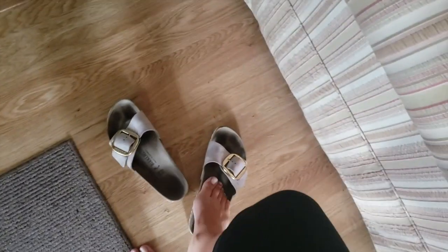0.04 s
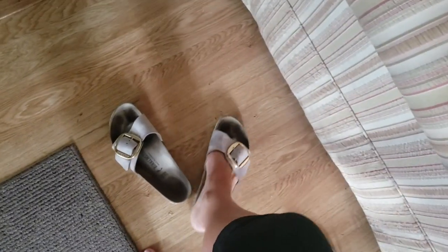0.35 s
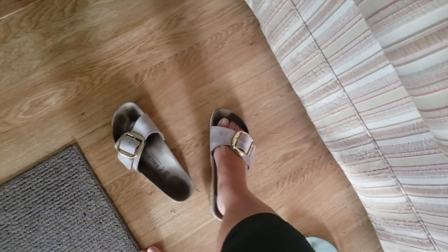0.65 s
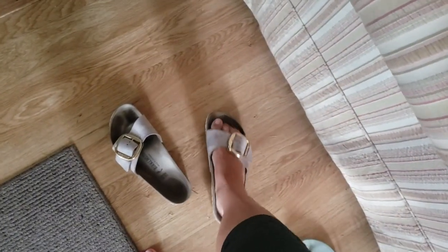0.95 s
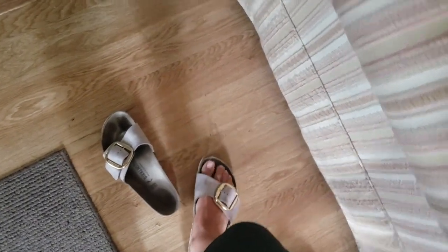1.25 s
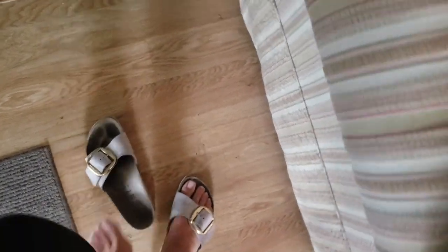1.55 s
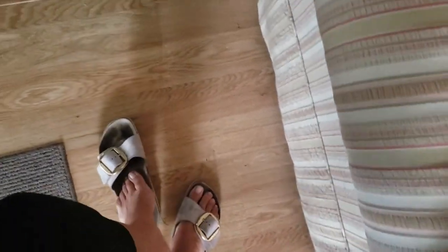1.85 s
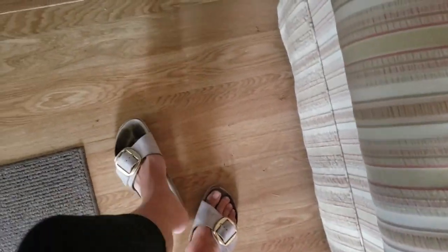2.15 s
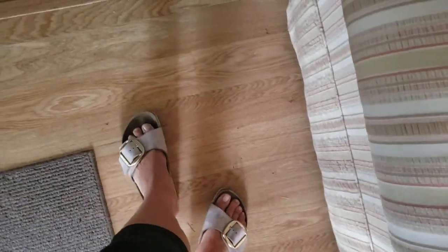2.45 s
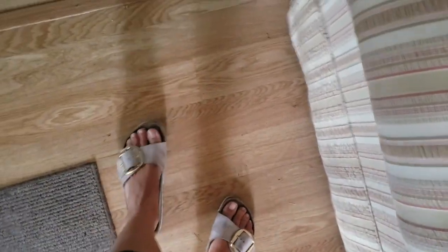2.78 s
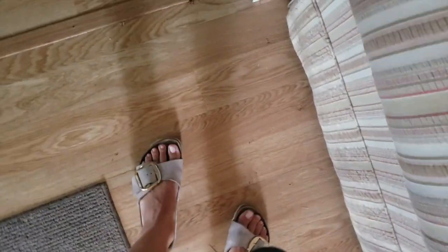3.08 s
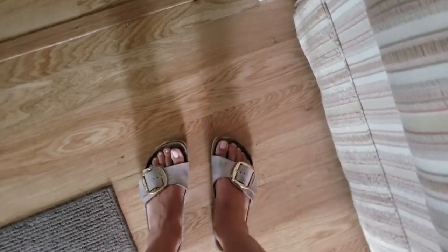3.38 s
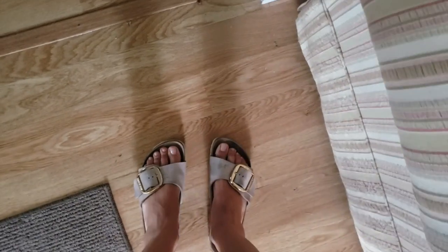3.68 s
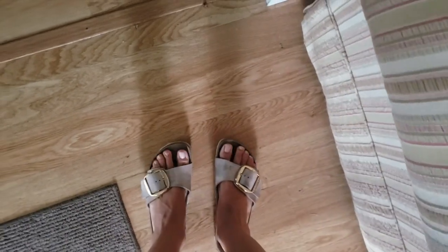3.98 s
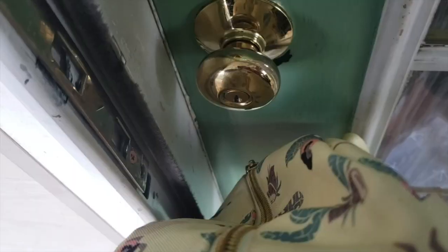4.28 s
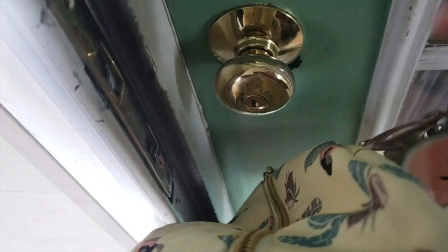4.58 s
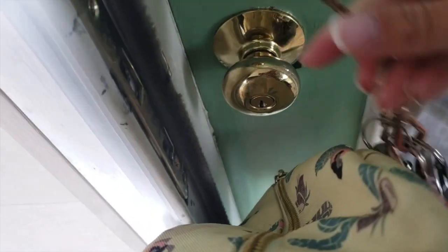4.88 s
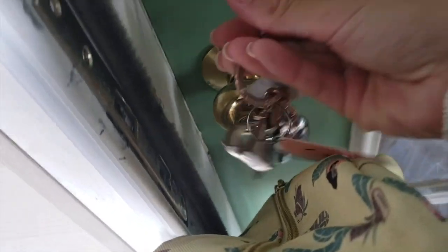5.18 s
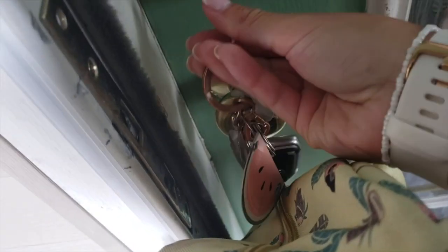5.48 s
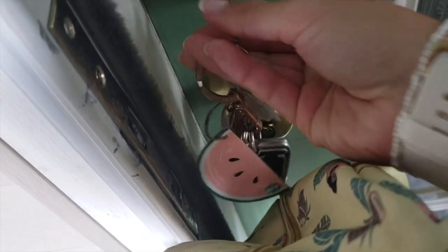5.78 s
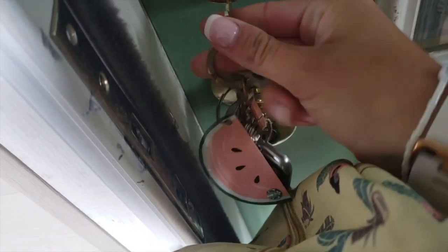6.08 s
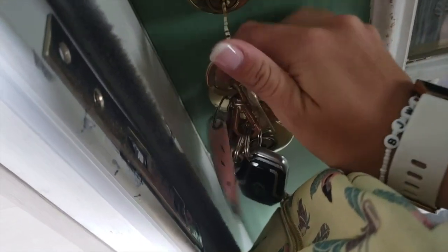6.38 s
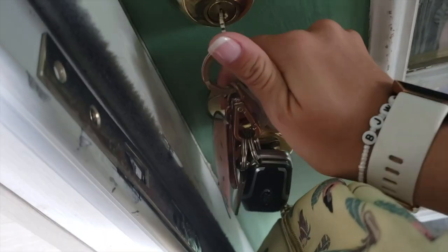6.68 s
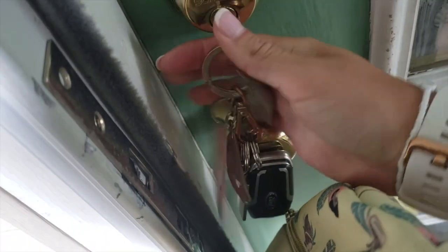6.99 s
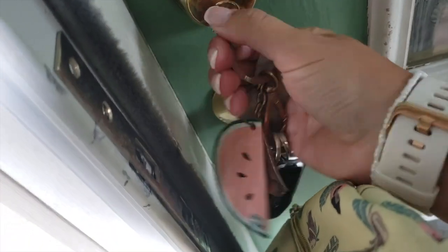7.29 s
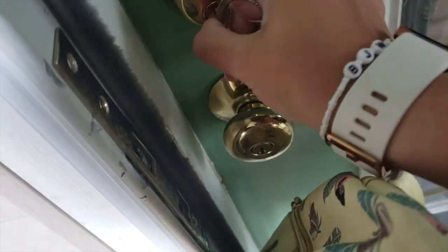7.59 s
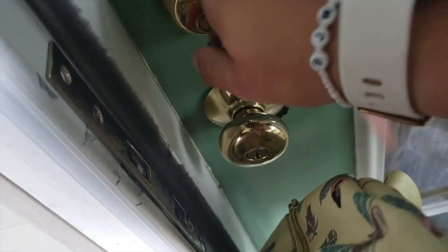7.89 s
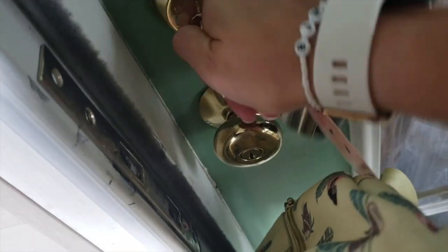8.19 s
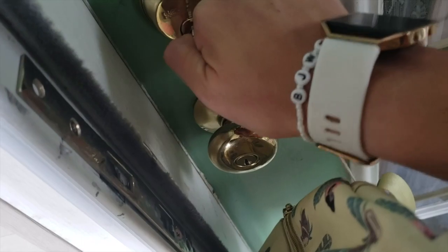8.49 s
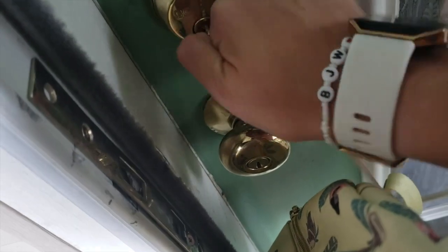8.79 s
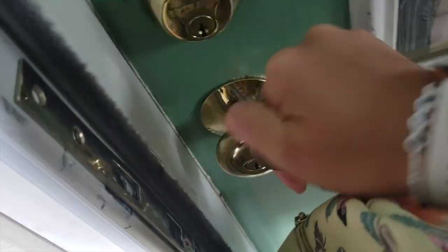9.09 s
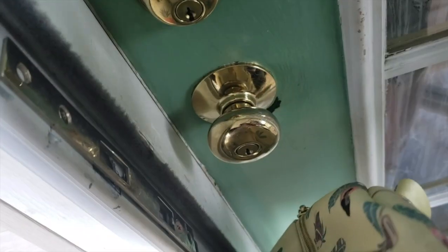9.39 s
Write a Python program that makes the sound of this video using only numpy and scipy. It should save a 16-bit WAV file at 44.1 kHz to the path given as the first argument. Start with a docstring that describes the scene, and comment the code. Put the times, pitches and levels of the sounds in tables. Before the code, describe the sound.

Feet slide softly into sandals on a wooden floor, then keys jingle close by and turn in a rattling door lock.

```python
"""A quiet room with a wooden floor, then the doorstep outside. Indoors, feet slide into sandals and shuffle:
skin and soles rub in tiny slips, buckles tick, weight settles on the boards and one sole skids sharply.
Abruptly we are at the front door, keys close to the microphone: they clink and ring in their bending modes,
one turns in the rattling brass lock, the bolt knocks over, the door shudders and the key is pulled out.
Behind them lie a low rumble, far machinery and a distant bird."""
import sys
import numpy as np
from scipy import signal
from scipy.fft import rfft, irfft
from scipy.io import wavfile
from scipy.ndimage import uniform_filter1d

SR = 44100
rng = np.random.default_rng(int(sys.argv[2]) if len(sys.argv) > 2 else 0)


def int16_out(signal):
    """Quantize to a 16-bit WAV file."""
    q = np.round(np.clip(np.atleast_2d(signal).T, -1, 1) * 32767)
    wavfile.write(sys.argv[1], SR, q.astype(np.int16))


N = 416683
TIME = np.arange(N) / SR
AGE = np.arange(SR // 2) / SR  # seconds since a blow
CLOCK = np.arange(0, N / SR, .001)  # coarse time for envelopes
OUTSIDE_S = 4.299  # from the room to the doorstep

# Levels are relative; pan_db is left minus right at the microphone; t60_s is the time to fall 60 dB.
# room tone and the air outside: frequency_hz, level_db
ROOM_TONE = [(25, -8), (62, 1), (100, -7), (170, -9), (300, -13), (500, -20), (1000, -27), (2200, -29),
             (4000, -32), (6400, -29), (8200, -37), (13000, -31), (16000, -33)]
OUTDOOR_TONE = [(15, -5.5), (25, -33), (43, -3.5), (87, -2.5), (161, -12), (206, -19), (326, -13.5),
                (416, -19.5), (575, -26), (840, -24), (1160, -34), (3080, -36), (8590, -40.5),
                (14800, -36.5), (16000, -39)]
# far machinery: pitch_hz, level_db
MACHINE_TONES = [(62, -53), (91.5, -52.5), (123.8, -55.5), (303, -74)]
# a distant bird: start_s, length_s, start_hz, end_hz, level_db
BIRD_WHISTLES = [(8.08, .14, 3330, 3190, -58), (8.57, .14, 3410, 3250, -59), (9.19, .13, 3320, 3200, -63)]

# spectra of rubbing, fine hiss, the skid, a wooden board and a hollow sole: frequency_hz, level_db
RUB_TONE = [(300, -29), (620, -9), (900, -20.5), (1700, -16), (2500, -1), (3400, -1.5), (4800, 2),
            (6400, 8), (8000, -11.5), (12000, -60.5)]
HISS_TONE = [(4000, -48), (7500, -1.5), (10500, 7), (13500, 2.5), (16000, 7.5)]
SKID_TONE = [(180, -29.5), (300, -30.5), (447, -43), (593, -32.5), (1100, -40), (1210, -52), (1530, -26),
             (1870, -31.5), (2250, -18.5), (3400, -15), (3950, -17), (4300, -11.5), (9390, -8.5),
             (11700, -1.5), (16000, -14)]
BOARD_TONE = [(50, -31), (130, -2.5), (210, 3.5), (330, -0.5), (450, -11), (900, -14), (3000, -74)]
SOLE_TONE = [(200, -22), (450, 8.5), (600, 8), (850, 1), (1300, -34.5), (4000, -41)]
# hollow rasp of the gap under the foot: multiple_of_resonance, level_db
RASP_TONE = [(0.151, -24), (0.301, -18.5), (0.497, -24), (.8, -10.5), (1, 0.5), (1.201, -7), (1.7, -8),
             (4, -12.5)]
# strokes of foot and sole: peak_s, rise_s, fall_s, rub_db, rasp_db, hiss_db, gap_hz, glide_octaves_per_s
FOOT_STROKES = [(.24, 0.078, 0.26, -67, -63, -67, 2120, 0.5),
                (0.427, 0.12, 0.14, -46.5, -47, -43, 2170, -2.5),
                (.58, .1, 0.29, -59.5, -59.5, -73, 1660, 3.5),
                (.725, 0.073, 0.089, -52, -61, -51.5, 1310, 0), (.885, 0.041, .1, -53, -53.5, -58, 1440, 0),
                (1.02, .05, 0.064, -64, -63.5, -68, 2030, 0),
                (1.165, 0.052, 0.11, -50.5, -89, -47.5, 2300, 2),
                (1.39, 0.079, 0.061, -70, -84, -68, 840, 0), (1.509, 0.1, .08, -100, -56, -57.5, 944, 1.5),
                (1.84, 0.028, 0.056, -68, -101, -71, 1300, 0),
                (1.915, .02, 0.056, -72, -96, -63.5, 1300, 0), (1.99, 0.05, 0.14, -72, -93, -69, 1300, 0),
                (2.2, 0.1, 0.26, -57, -58.5, -57, 1420, -0.3),
                (2.335, 0.08, 0.071, -53, -61, -48, 1590, -1),
                (2.515, 0.075, .11, -52, -53.5, -53.5, 1860, 0.5), (2.65, 0.08, .1, -62, -89, -57, 1800, 0),
                (2.73, 0.061, 0.084, -61.5, -71, -60.5, 1740, 4),
                (2.96, 0.12, .18, -71, -97, -63.5, 1200, 0), (3.1, 0.1, .09, -69.5, -71, -63.5, 870, 1),
                (3.165, 0.041, 0.13, -58.5, -78, -49, 875, 0)]
# weight settling on the boards: start_s, level_db, hollow_sole_db
FOOTFALLS = [(0.528, -55.5, -20), (0.664, -48.5, -4), (0.714, -61, -1), (1.268, -47, -36),
             (1.305, -59, -21), (3.034, -54.5, -21), (3.261, -51.5, -21)]
# straps and buckles ticking: start_s, level_db
BUCKLE_TICKS = [(0.2993, -35), (0.6454, -56), (0.716, -27), (1.5844, -39.5), (1.8248, -53), (2.7127, -40)]

# modes of the door panel, its frame, the lock's brass and the bending keys: pitch_hz, level_db, t60_s
PANEL_RINGS = [(300, -7.5, 0.17), (386, -11.5, 0.2), (516, -8.5, 0.11), (628, -0.5, 0.039),
               (702, -11.5, 0.1), (795, 7, 0.018), (1330, -33, 0.017)]
FRAME_RINGS = [(77.2, -1.5, 0.81), (91.2, 15, 0.27), (133, -10, 0.2)]
BRASS_RINGS = [(1050, 3.5, 0.06), (1244, -10, 0.12), (1567, 13, 0.027), (1852, 5.5, 0.06), (2244, -2, 0.1),
               (2960, -18, .06), (3180, -5, 0.14), (3540, -7, 0.21), (3900, -10, 0.27), (4490, 0, 0.12),
               (4900, -31, 0.04)]
KEY_RINGS = [(3150, -10, .1), (3420, -8, .1), (3960, -3, .07), (4680, -4, .08), (5600, -6, .08),
             (6660, 0, .13), (7230, -6, .1), (7490, -8, .14), (9090, -9, .15), (9890, -8, .16),
             (10500, -9, .13), (10990, -8, .13), (11500, -8, .12), (11920, -6, .12), (12630, -6, .13),
             (13240, -2, .13), (13880, -3, .1), (14255, -1, .13), (14700, -4, .08), (15150, -2, .08),
             (15460, -1, .13)]
# spectra of bare contact on the door, the brass and the keys (high, low): frequency_hz, level_db
DOOR_TONE = [(80, -26), (180, -4), (300, 5), (420, -2), (520, -2), (780, -4), (1100, -9.5), (3000, -42)]
BRASS_TONE = [(400, -6.5), (800, -4.5), (1200, -1), (2000, -3), (4000, -1.5), (6800, -4), (9000, -22.5),
              (16000, -45)]
KEY_HIGH_TONE = [(4000, -41), (7500, -9.5), (9500, -3.5), (12000, -0.5), (14000, 4), (16000, 1)]
KEY_LOW_TONE = [(500, -6), (1500, -1), (2600, 0.5), (3800, 11.5), (5200, 4.5), (6700, 12), (8500, -3),
                (14000, -99)]
# the bolt knocking home: start_s, level_db
BOLT_KNOCKS = [(8.0682, -11.5), (8.9132, -14)]
# the door shifting in its frame: start_s, level_db, panel_rattle_db
DOOR_SHUDDERS = [(5.216, -32.5, -9.5), (6.615, -30, -5.5), (6.671, -33.5, -2), (6.81, -33, 0.5),
                 (7.259, -28, -5.5), (7.452, -33.5, 1.5), (7.56, -31.5, -2), (8.076, -32, -9),
                 (8.914, -29, -4), (8.944, -19.5, -8), (8.985, -23.5, -8)]
# key, pins and bolt striking: start_s, level_db, door_body_db, bright_edge_db, ring_hz, pan_db, rattle_t60_s
LOCK_STRIKES = [(4.5204, -38, -35, 7, 1114, -2, 0.032), (4.5348, -38, -38, -5, 4400, 8, 0.015),
                (4.7263, -33.5, -27, -3, 944, 0, 0.0092), (5.2133, -21, -8.5, 7, 1175, 1.5, 0.017),
                (5.2953, -21.5, -13.5, 8.5, 3890, 4, 0.0049), (5.8591, -36.5, -31, 7, 6600, 10, 0.0063),
                (6.1184, -35, -23, 1, 1570, 4, 0.0063), (6.2104, -35, -9, 13, 6600, 7, 0.04),
                (6.6706, -33, -9, 0, 1130, 7, 0.054), (6.701, -30.5, -6, -1, 1140, 5, 0.085),
                (6.7616, -23, -4.5, -4, 1240, 6, 0.0091), (7.0548, -25, -19, -7, 3340, 9.5, 0.0059),
                (7.253, -21.5, -5.5, 6.5, 1260, 5, 0.02), (7.44, -21, -1.5, -30, 883, 6.5, 0.0076),
                (7.449, -46, -5, -5, 920, -4, 0.025), (7.498, -32, -3, -11, 3030, 7.5, 0.02),
                (7.5637, -36.5, -3, -17, 1710, 14, 0.019), (7.5997, -31.5, -1.5, -23, 3040, 6.5, 0.035),
                (7.7987, -47.5, 3.5, 3, 3830, 7, 0.02), (7.8556, -32, -14, -9, 2420, 3, 0.015),
                (7.885, -33.5, -5.5, -6, 3440, 2, 0.075), (8.2798, -36, -10, -9, 5070, 6, 0.0054),
                (8.646, -36, -13, 3, 1400, 6.5, 0.018), (8.696, -21.5, -5, 6, 1450, 4.5, 0.018),
                (8.7134, -28.5, -10, 8, 1310, 3, 0.044), (8.7894, -32.5, -19, -14, 1900, 5, 0.047),
                (8.9125, -28, -2, 11, 913, 0.5, 0.015), (8.9502, -31.5, -5, 5, 1183, 6.5, 0.02),
                (9.1497, -20.5, -11.5, 14, 4180, -3.5, 0.045), (9.1572, -24, -16, -4, 3900, 11, 0.065),
                (9.1683, -25.5, -36, 11.5, 3070, -6, 0.026), (9.3228, -27.5, -41, 0, 2230, 5, 0.0044),
                (9.3824, -34.5, -15, 13, 3430, 5, 0.14), (9.418, -31, -38, -3, 2100, 1, 0.043)]
# the bunch shaken or the blade sliding in its slot: peak_s, half_length_s, jingle_db, scrape_db
BUNCH_SHAKES = [(4.792, 0.035, -44, -55), (5.656, 0.024, -47, -56), (6.002, 0.091, -43.5, -53.5),
                (6.24, 0.12, -42.5, -54.5), (6.49, 0.099, -43, -61.5), (6.799, 0.065, -35.5, -45),
                (6.92, 0.023, -39, -49.5), (7.06, 0.031, -51, -53), (7.198, 0.035, -48, -58),
                (7.343, 0.17, -47, -48), (7.479, 0.12, -46, -43), (7.574, 0.089, -46, -49.5),
                (7.89, 0.081, -50, -46), (8.635, 0.053, -54, -54), (8.79, 0.16, -46.5, -55),
                (9.02, 0.11, -42.5, -48.5), (9.15, 0.062, -41, -50.5), (9.413, 0.095, -32.5, -45)]
# keys striking each other, close by: start_s, level_db, lower_partials_db, pan_db
KEY_CLINKS = [(4.306, -27.5, -12.5, -5), (4.32, -25, -12, 0), (4.3632, -31.5, -4, 1),
              (4.3809, -25.5, -9, -3), (4.442, -28, -5.5, 0), (4.465, -31.5, -3, 0), (4.5065, -11, -17, 1),
              (4.5367, -14, -10, 1), (4.6098, -22, -6.5, 2), (4.702, -31, -26, -2),
              (4.7264, -22, -10.5, -2), (4.742, -32, -13, -1), (4.8853, -31, -3, -1.5),
              (5.008, -29.5, -10, -4), (5.0422, -30.5, -8, 1), (5.1053, -20, -12.5, -.5),
              (5.18, -32.5, -12, 5), (5.24, -22, -4.5, 1), (5.3241, -27.5, -1, 2), (5.3843, -36.5, -3, 7),
              (5.4377, -28, -10.5, 0), (5.495, -27.5, -16, 1), (5.56, -35.5, -4.5, 3),
              (5.5993, -36.5, -2.5, 5), (5.8609, -19.5, -15.5, -1), (5.965, -22, -18.5, 0.5),
              (6.1677, -33, -17, -2), (6.208, -23.5, -19, -6), (6.437, -32, -3, 3), (6.6168, -29.5, -13, 1),
              (6.669, -19.5, -24, -2), (6.703, -18.5, -19, -2), (6.759, -11.5, -31, -1),
              (6.79, -21, -21, -2.5), (6.8696, -17.5, -10.5, 3), (6.8817, -23, -14, -5),
              (6.9065, -25.5, -6.5, 8), (6.9296, -25, -13, 1), (6.987, -18.5, -11, 6),
              (7.018, -18.5, -10, 2.5), (7.0543, -17, -9.5, -2), (7.078, -12, -9.5, 1.5),
              (7.1324, -26, -7.5, 3), (7.1733, -26, -4, 4), (7.187, -15.5, -14, 0),
              (7.1988, -24.5, -1.5, 4), (7.225, -15, -12, 4), (7.2537, -20, -35, -13), (7.2704, -22, -8, 4),
              (7.3257, -24, -23, -2), (7.34, -23.5, -3.5, 5), (7.3713, -32, -2, 7), (7.453, -24, -26, -3),
              (7.52, -25.5, -10, 0), (7.5622, -26, -11, -7), (7.8001, -27, -7.5, 2), (7.8266, -25, -8.5, 0),
              (7.8531, -21, -6.5, -3), (7.9, -29, -10, -1), (8.2867, -31.5, -28, -7), (8.6362, -38, -6, -6),
              (8.7127, -24, -16, -12), (8.788, -28, -1.5, -1), (8.871, -36, -17, -9), (8.949, -26, -29, -3),
              (8.972, -21, -12.5, -3), (8.991, -19.5, -9.5, 1), (9.011, -19.5, -17, -2),
              (9.2684, -28, -11, -4), (9.3827, -27.5, -13, -4), (9.415, -18, -17, -7)]


def amp(db):
    """Decibels to gain."""
    return 10 ** (np.asarray(db) / 20)


def unit(x):
    """Scale to rms 1."""
    return x / np.sqrt(np.mean(x ** 2))


def blow(x, size=88, crest_db=5):
    """Scale a blow so that its peak lies near 1."""
    power = uniform_filter1d(np.mean(np.atleast_2d(x) ** 2, axis=0), size)
    return amp(-crest_db) * x / np.sqrt(power.max())


def pan(db):
    """Left and right gains, db apart."""
    return amp(np.array([[.5], [-.5]]) * db)


def fade(t60):
    """Exponential decay after a blow."""
    return np.exp(-np.log(1000) * AGE / max(t60, 1e-3))


def add(out, s, sound):
    """Mix a sound in at time s."""
    i = max(int(s * SR), 0)
    out[:, i:i + sound.shape[-1]] += sound[..., :N - i]


def through(x, response):
    """Pass a sound through an impulse response."""
    return signal.fftconvolve(np.atleast_2d(x), np.atleast_2d(response), axes=1)[:, :x.shape[-1]]


def moving(x, response_at, size=4410):
    """Pass overlapping stretches of a sound through a response that changes with time."""
    out, window = np.zeros((2, N)), np.hanning(size)
    for i in np.arange(0, N - size, size // 2):
        stretch = np.atleast_2d(x[..., i:i + size] * window)
        if stretch.any():
            response = np.atleast_2d(response_at((i + size / 2) / SR))
            add(out, i / SR, signal.fftconvolve(stretch, response, axes=1))
    return out


def colour(points, size=1024):
    """Causal impulse response of unit energy with the given (frequency_hz, level_db) spectrum."""
    hz, db = np.transpose(points)
    bins = np.maximum(np.arange(size // 2 + 1) * SR / size, 1)
    cepstrum = irfft(np.log(amp(np.interp(np.log(bins), np.log(hz), db))))
    cepstrum[1:size // 2] *= 2  # fold to minimum phase
    cepstrum[size // 2 + 1:] = 0
    response = irfft(np.exp(rfft(cepstrum)))
    return response / np.linalg.norm(response)


def patchy(points, spread_db, count=28):
    """A colour with random peaks and dips: no two contacts happen at the same spot."""
    hz, db = np.transpose(points)
    grid = np.geomspace(hz[0], hz[-1], count)
    uneven_db = np.interp(np.log(grid), np.log(hz), db) + spread_db * rng.standard_normal(count)
    return colour(np.transpose([grid, uneven_db]))


def partials(modes):
    """One decaying sine for each mode."""
    return np.array([amp(db) * fade(t60) * np.sin(2 * np.pi * hz * AGE) for hz, db, t60 in modes])


def wander(rate_hz):
    """Smooth random drift of rms 1."""
    hold = int(SR / rate_hz)
    steps = np.repeat(rng.standard_normal(N // hold + 1), hold)
    return unit(uniform_filter1d(uniform_filter1d(steps, hold), hold)[:N])


def grains(n, per_s, spread_db):
    """Tiny contacts at random moments with uneven sizes."""
    impulses = (rng.random(n) < per_s / SR) * rng.choice([-1, 1], n)
    return unit(impulses * amp(spread_db * np.minimum(rng.exponential(size=n), 4)))


def swell(peak_s, rise_s, fall_s):
    """A movement at its height at peak_s, 20 dB weaker a rise before and a fall after."""
    before = np.maximum((peak_s - CLOCK) / rise_s, 0)
    after = np.maximum((CLOCK - peak_s) / fall_s, 0)
    return amp(-20 * (before ** 2.64 + after ** 1.66))  # powers above 1 bite suddenly, then hold


def together(envelopes, db):
    """Strength of overlapping movements, each with its own level."""
    return np.interp(TIME, CLOCK, np.sqrt(amp(db) ** 2 @ np.square(envelopes)))


def contact(chatter_t60, chatter_db):
    """A first touch, then the pieces chatter against each other."""
    chatter = grains(len(AGE), per_s=2500, spread_db=2.5) * fade(chatter_t60) * (1 - fade(0.0021))
    force = amp(chatter_db) * chatter / (np.linalg.norm(chatter) + 1e-9)
    force[0] += 1
    return force


def struck(force, tone, rings, ring_db):
    """Bare contact sound plus modes; every point of impact stirs the modes differently."""
    response = rng.standard_normal((2, len(rings))) @ rings
    response *= amp(ring_db) * np.sqrt(2) / np.linalg.norm(response)
    response[:, :len(tone)] += tone
    return through(force, response)


def space(early_db, early_t60, late_db, late_t60, lag_samples=8):
    """Path to the microphone: direct sound, lagging at random on the right, near reflections and a tail."""
    response = np.zeros((2, len(AGE)))
    for db, t60 in ((early_db, early_t60), (late_db, late_t60)):
        reflections = rng.standard_normal((2, len(AGE))) * fade(t60) * (1 - fade(0.0065))
        response += amp(db) * reflections / np.linalg.norm(reflections[0])
    response[0, 0] += 1
    response[1, rng.integers(lag_samples)] += 1
    return response


def doorway():
    """The door and its frame throw each click straight back at the microphone."""
    return space(early_db=-2, early_t60=.055, late_db=-12, late_t60=.2)


def air(spectrum, db, wander_db, wide_hz):
    """The air all around, swelling gently; below wide_hz both channels are alike."""
    mid, side = through(rng.standard_normal((2, N)), colour(spectrum, size=8192))
    side = signal.sosfilt(signal.butter(1, wide_hz, "high", fs=SR, output="sos"), side)
    return amp(db + wander_db * wander(5)) * np.array([mid + side, mid - side]) / np.std(mid)


def machinery():
    """Far off, machinery drones, wavering in strength and phase."""
    return sum(amp(db + 2 * wander(6.1)) * np.sqrt(2) * np.sin(2 * np.pi * hz * TIME + 1.04 * wander(8))
               for hz, db in MACHINE_TONES)


def bird():
    """In the distance, soft pure whistles slide down."""
    out = np.zeros((2, N))
    for s, length_s, start_hz, end_hz, db in BIRD_WHISTLES:
        hz = np.linspace(start_hz, end_hz, int(length_s * SR))
        arch = np.sin(np.linspace(0, np.pi, len(hz)))
        add(out, s, amp(db) * arch * np.sin(2 * np.pi * np.cumsum(hz) / SR))
    return through(out, space(early_db=-14, early_t60=.05, late_db=-14, late_t60=.3, lag_samples=1))


def sliding_feet():
    """A little to the left, skin and soles rub in dense tiny slips that stir the gap under the foot."""
    peak_s, rise_s, fall_s, rub_db, rasp_db, hiss_db, gap_hz, glide = np.transpose(FOOT_STROKES)
    strokes = np.array([swell(*shape) for shape in zip(peak_s, rise_s, fall_s)])

    def gap(s):
        """The stroke that rasps most sets the gap's gliding resonance."""
        k = np.argmax(amp(rasp_db) * strokes[:, np.searchsorted(CLOCK, s)])
        octaves = glide[k] * np.clip(s - peak_s[k], -rise_s[k], fall_s[k])
        return colour(np.array(RASP_TONE) * [gap_hz[k] * 2 ** octaves, 1])

    grip = amp(0.65 * wander(60)) * (TIME < OUTSIDE_S)
    slips, fine_slips = (grip * grains(N, per_s=9000, spread_db=2.5) for _ in range(2))
    rubbing = together(strokes, rub_db) * through(slips, colour(RUB_TONE))
    hiss = together(strokes, hiss_db) * through(fine_slips, colour(HISS_TONE))
    rasp = amp(-2) * together(strokes, rasp_db) * moving(slips, gap)
    return (rubbing + hiss + rasp) * pan(3)


def skid(start_s=3.256, attack_s=0.0026, hold_s=0.086, sag_db_per_s=62.5, release_db_per_s=300.5):
    """One sole bites, sags a little while it slides, then lifts."""
    age = np.maximum(TIME - start_s, 0)
    db = -28.5 - sag_db_per_s * age - release_db_per_s * np.maximum(age - hold_s, 0)
    pressure = np.minimum(age / attack_s, 1) * amp(db)
    return pressure * through(grains(N, per_s=5900, spread_db=3.0), colour(SKID_TONE))


def sandals():
    """In the room, feet slide and skid, buckles tick and heels settle on the boards."""
    out = sliding_feet() + skid()
    for s, db in BUCKLE_TICKS:
        add(out, s, amp(db) * blow(through(contact(.02, chatter_db=-20), colour(HISS_TONE))))
    # the reflections change as the feet move
    out = amp(-0.5) * moving(out * (TIME < OUTSIDE_S),
                             lambda s: space(early_db=-3.5, early_t60=0.053, late_db=-6, late_t60=0.42))
    for s, db, hollow_db in FOOTFALLS:
        push = rng.standard_normal(len(AGE)) * fade(.26) * (1 - fade(.025))
        board = blow(through(push, colour(BOARD_TONE)))
        sole = blow(through(push, colour(SOLE_TONE)))
        add(out, s, amp(db) * (board + amp(hollow_db) * sole) * pan(1.7))
    return out


def door():
    """The bolt knocks the panel; the whole door rocks in its frame."""
    out, knock = np.zeros((2, N)), -partials(PANEL_RINGS).sum(axis=0)
    for s, db in BOLT_KNOCKS:
        path = space(early_db=-6, early_t60=0.086, late_db=-16, late_t60=0.39, lag_samples=3)
        panel = blow(through(knock, path))
        force = through(contact(0.012, chatter_db=0), doorway())
        snap = blow(through(force, colour(KEY_HIGH_TONE) + colour(KEY_LOW_TONE)))
        add(out, s, amp(db) * (panel + amp(-10) * snap) * pan(1))
    rocking = blow(partials(FRAME_RINGS).sum(axis=0) * (1 - fade(0.1)))  # builds slowly on the soft seal
    for s, db, rattle_db in DOOR_SHUDDERS:
        rattle = blow(through(rng.standard_normal(len(AGE)) * fade(0.43), colour(BOARD_TONE)))
        add(out, s, amp(db) * (rocking + amp(rattle_db) * rattle))
    return out


def lock():
    """Brass parts rattle in the cylinder and shake the door panel; the part hit rings at its own pitch."""
    out, rings = np.zeros((2, N)), partials(BRASS_RINGS)
    for s, db, body_db, edge_db, ring_hz, pan_db, rattle_t60 in LOCK_STRIKES:
        force = through(contact(rattle_t60, chatter_db=11.5), doorway())
        brass = blow(struck(force, patchy(BRASS_TONE, spread_db=0), rings, ring_db=-8))
        ring = amp(-7) * blow(partials([(ring_hz, 0, 90 / ring_hz)]))  # a high ring dies sooner
        edge = amp(edge_db - 3) * blow(through(force, colour(KEY_HIGH_TONE)))
        body = amp(body_db) * blow(through(rng.standard_normal(len(AGE)) * fade(0.12), colour(DOOR_TONE)))
        add(out, s, amp(db) * (brass + ring + edge + body) * pan(pan_db))
    return out


def swinging_bunch(carried_until_s=7.63, settle_t60=0.19):
    """Keys brush and the blade scrapes: a little while carried, more at shakes; clinks leave a jingle."""
    peak_s, half_length_s, jingle_db, scrape_db = np.transpose(BUNCH_SHAKES)
    shakes = [swell(s, half, half) for s, half in zip(peak_s, half_length_s)]
    clink_s, clink_db = np.transpose(KEY_CLINKS)[:2]
    decays = [(CLOCK > s) * amp(-60 * np.abs(CLOCK - s) / settle_t60) for s in clink_s]
    settling = together(decays, clink_db - 26)
    carried = TIME < carried_until_s
    jingling = np.sqrt(together(shakes, jingle_db) ** 2 + settling ** 2 + carried * amp(-57.5) ** 2)
    scraping = np.hypot(together(shakes, scrape_db), carried * amp(-59))
    rings = partials(KEY_RINGS)
    touches = grains(N, per_s=600, spread_db=3.5) * (TIME > OUTSIDE_S)
    jingle = moving(touches,
                    lambda s: struck(doorway(), patchy(KEY_HIGH_TONE, spread_db=4), rings, ring_db=-15))
    scrape = moving(touches, lambda s: through(doorway(), patchy(BRASS_TONE, spread_db=3)))
    return amp(-1.5) * (jingling * unit(jingle) + scraping * unit(scrape))


def keys(glancing_db=-25.5):
    """Close up, flat keys clink; each blow stirs its own mix of bending modes, damped by the other keys."""
    out, rings = np.zeros((2, N)), partials(KEY_RINGS)
    is_low = np.array(KEY_RINGS)[:, 0] < 8200
    for s, db, low_db, pan_db in KEY_CLINKS:
        chatter_db = 4.5 - 0.43 * (db - glancing_db)  # harder blows chatter less
        force = through(contact(chatter_t60=0.017, chatter_db=chatter_db), doorway())
        high = blow(struck(force, patchy(KEY_HIGH_TONE, spread_db=4), rings[~is_low], ring_db=-11))
        low = blow(struck(force, patchy(KEY_LOW_TONE, spread_db=4), rings[is_low], ring_db=-8))
        add(out, s, amp(db) * (amp(1.5) * high + amp(low_db) * low) * pan(pan_db))
    return out


def scene():
    """The microphone is in the room first, then abruptly on the doorstep."""
    inside = sandals() + air(ROOM_TONE, db=-71, wander_db=.7, wide_hz=900)
    outside_age = np.maximum(TIME - OUTSIDE_S, 0)
    swelling = amp(-3 * np.exp(-outside_age / 0.77))  # the rumble starts 3 dB softer
    street = machinery() + bird() + swelling * air(OUTDOOR_TONE, db=-47.5, wander_db=1.37, wide_hz=430)
    outside = keys() + swinging_bunch() + lock() + door() + street
    crossfade = np.minimum(outside_age / .006, 1)
    return (1 - crossfade) * inside + crossfade * outside


def record(dry):
    """The microphone is a phone's, which cuts the top above 15.9 kHz."""
    return signal.sosfilt(signal.ellip(10, .2, 70, 15900, fs=SR, output="sos"), dry)


dry = scene()
out = record(dry)
int16_out(out)
```